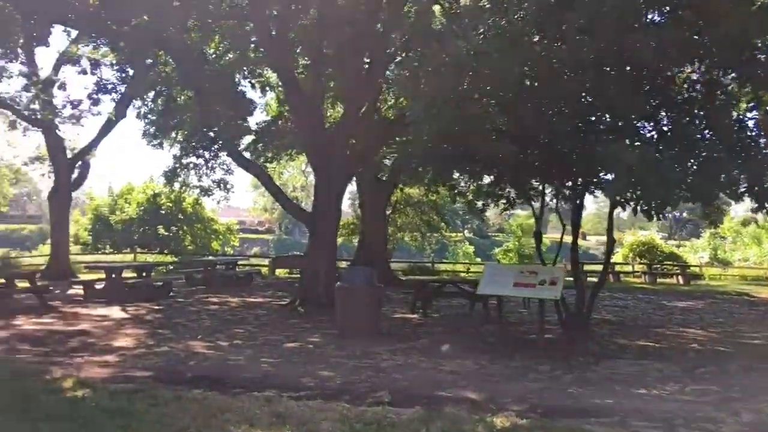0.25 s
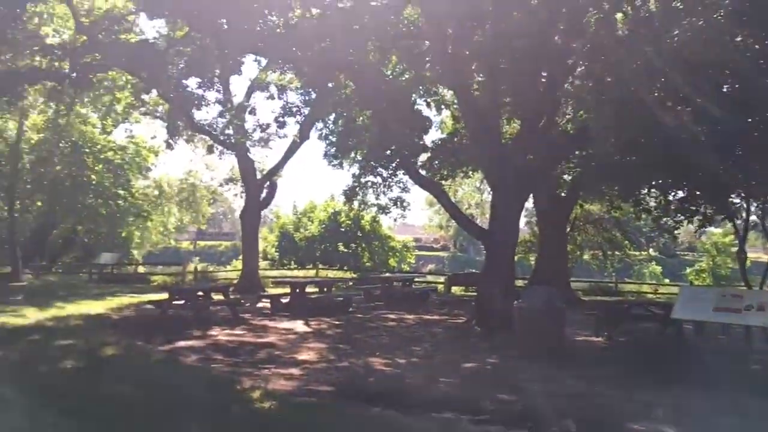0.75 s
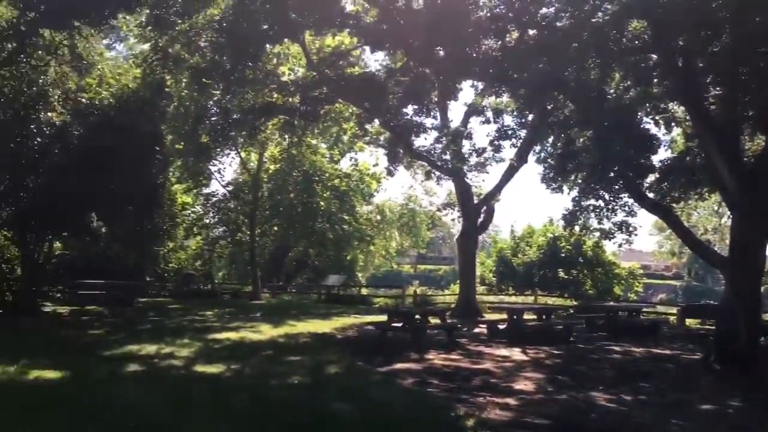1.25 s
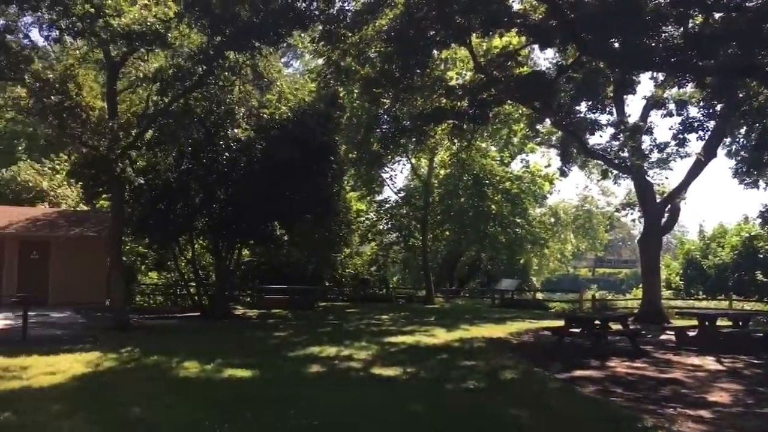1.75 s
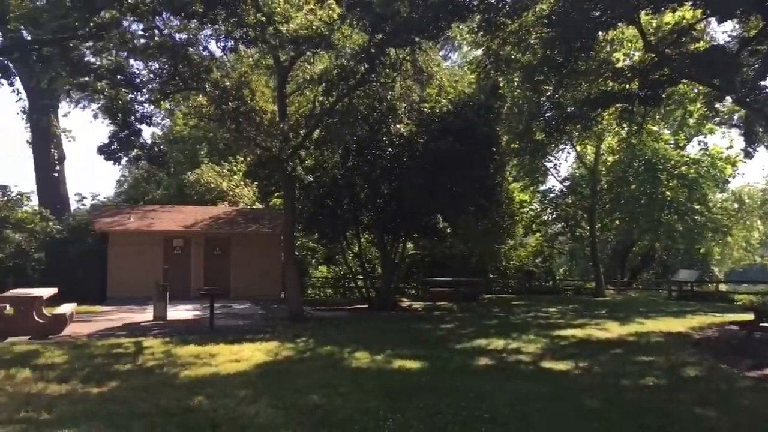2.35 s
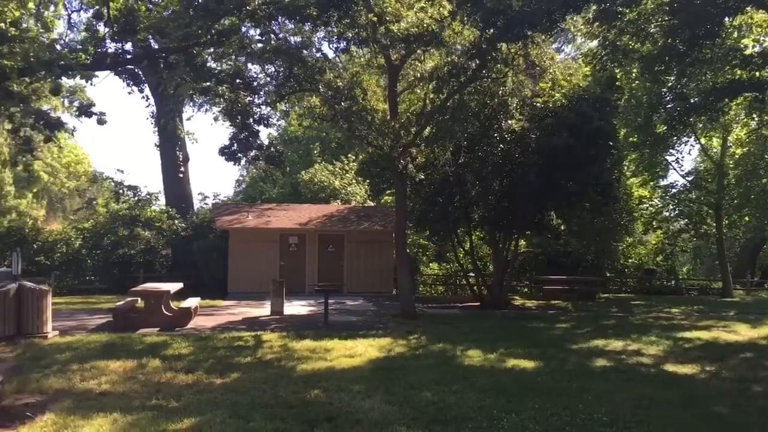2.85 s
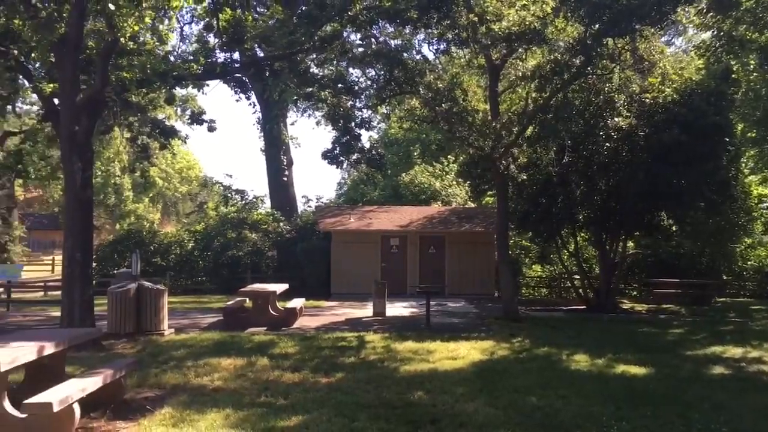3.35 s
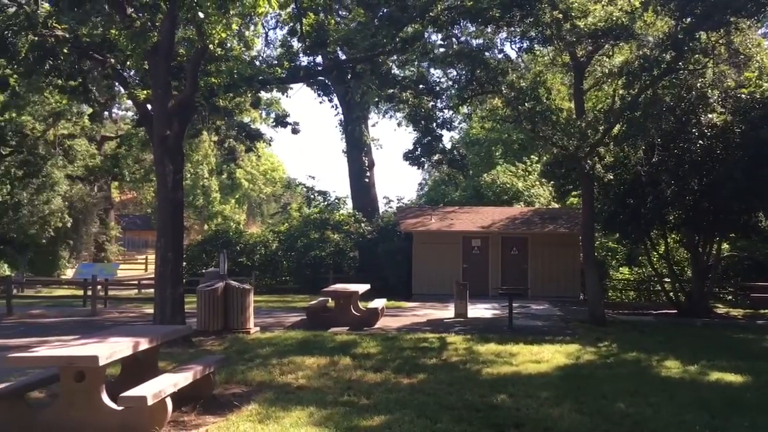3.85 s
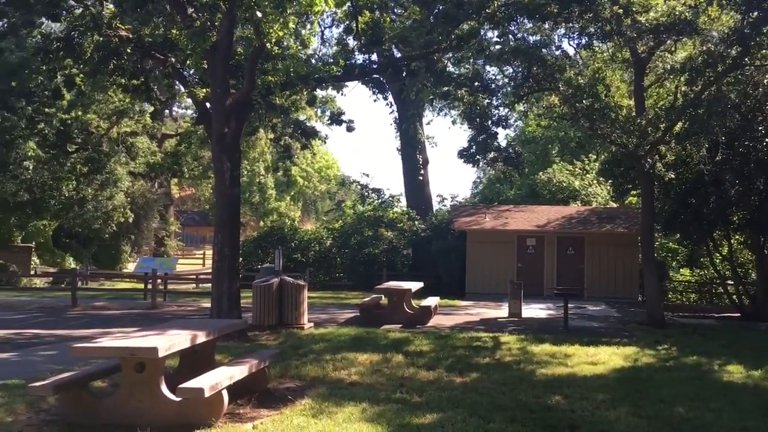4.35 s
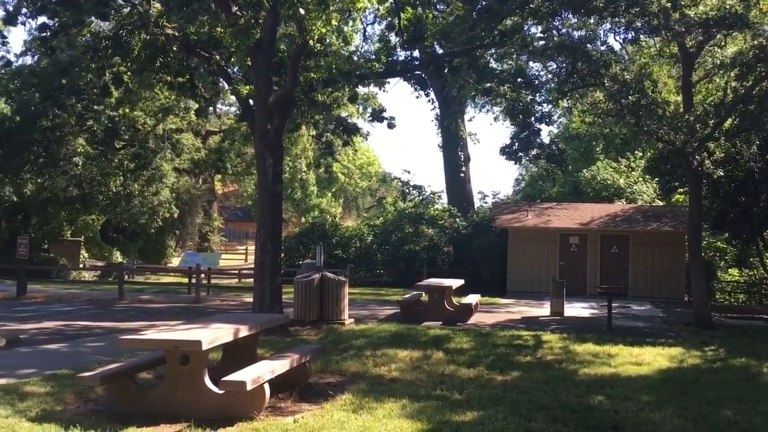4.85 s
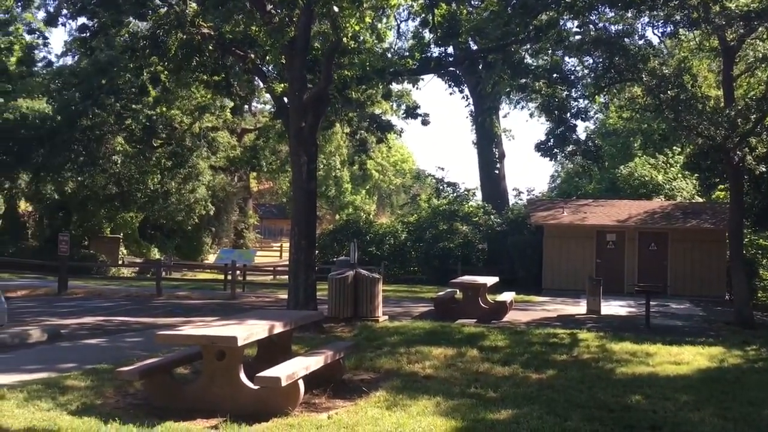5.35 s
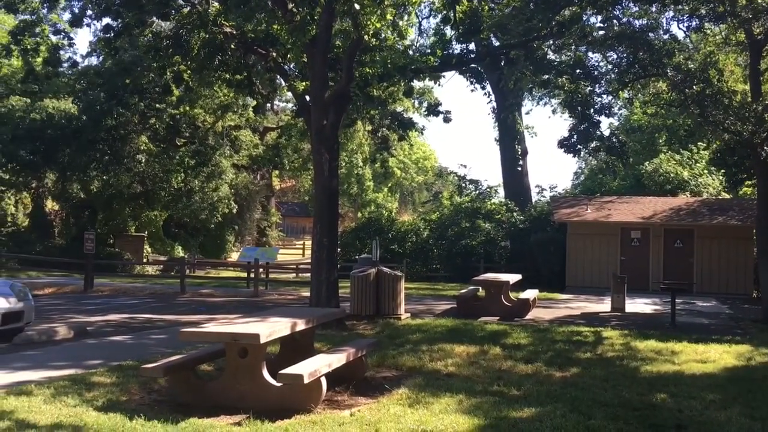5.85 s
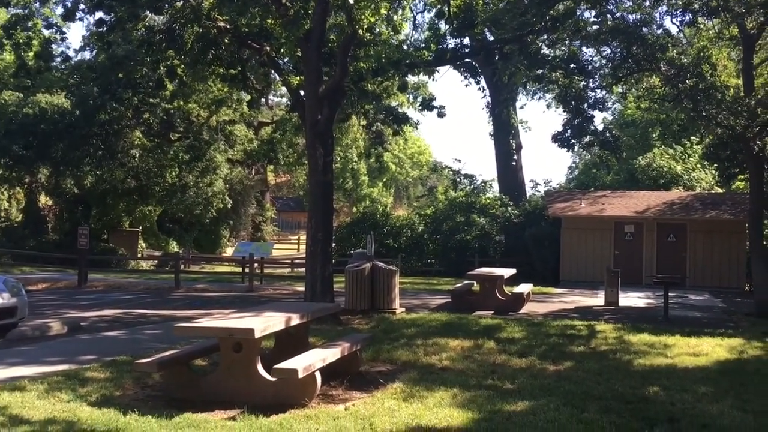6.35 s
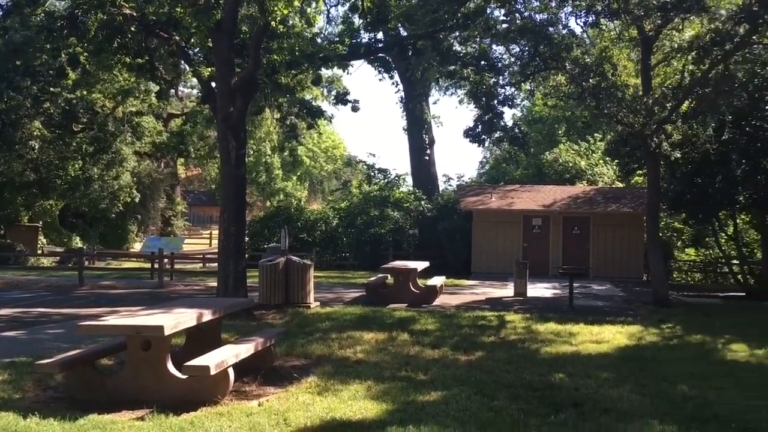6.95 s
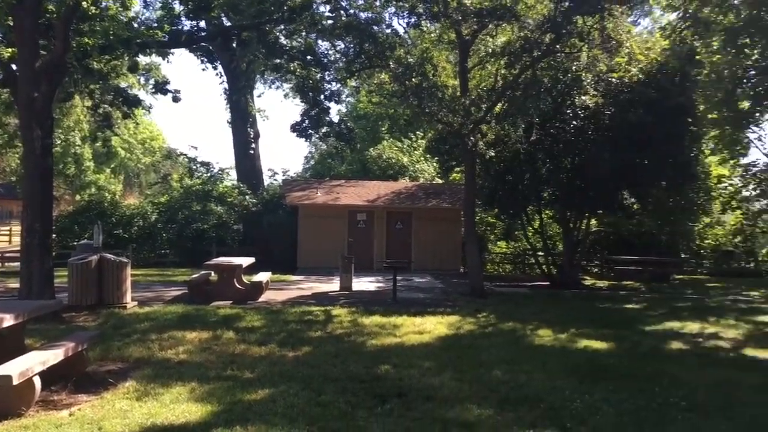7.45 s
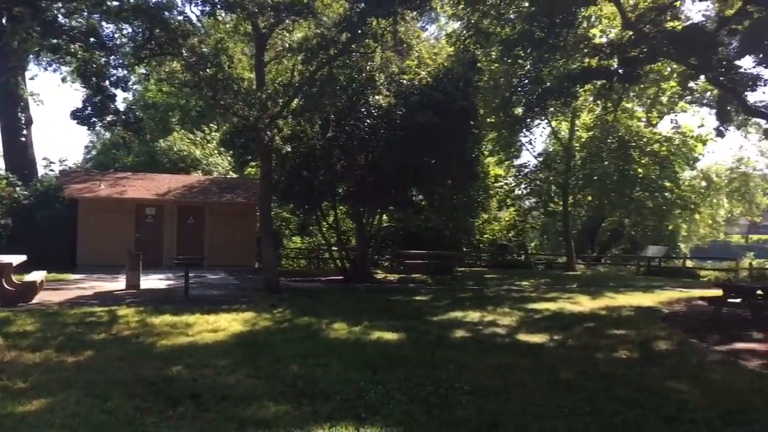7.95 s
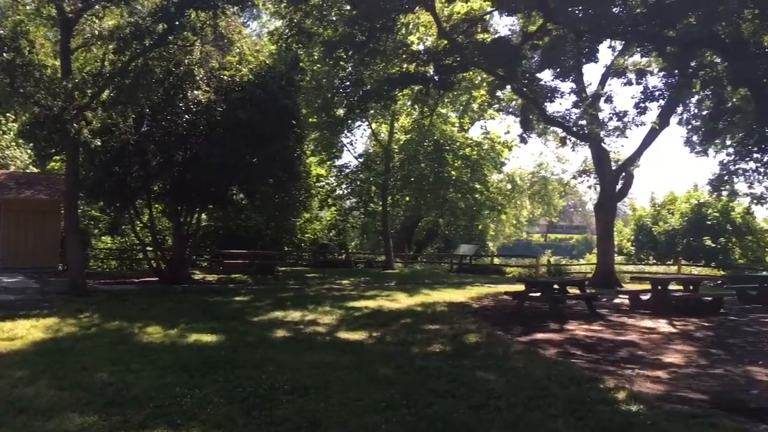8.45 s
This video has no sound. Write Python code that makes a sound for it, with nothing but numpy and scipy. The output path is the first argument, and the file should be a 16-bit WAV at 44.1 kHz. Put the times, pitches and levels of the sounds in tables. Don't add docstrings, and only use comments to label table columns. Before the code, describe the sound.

Birds chirp and sing buzzy slurred songs in a shaded park while a low engine drone and distant road rumble slowly grow underneath.

```python
import sys
import numpy as np
from scipy import signal
from scipy.fft import rfft, irfft, next_fast_len
from scipy.io import wavfile
from scipy.ndimage import uniform_filter1d

SR = 44100
rng = np.random.default_rng(int(sys.argv[2]) if len(sys.argv) > 2 else 0)


def inscribe(sig):
    pcm = np.round(np.clip(np.atleast_2d(sig).T, -1, 1) * 32767)
    wavfile.write(sys.argv[1], SR, pcm.astype(np.int16))


def decibels_to_gain(level_db):
    exponent = np.asarray(level_db, float) / 20
    return 10 ** exponent


N = 384111

# (time [s], firing rate [Hz], level [dB])
ENGINE = [(0, 85.7, -49.5), (.3, 86.8, -67), (.6, 87.25, -55), (.74, 87.58, -47.5), (1.1, 92.7, -44),
          (1.4, 95.3, -43), (1.8, 96.5, -42.5), (2.23, 96.83, -41), (2.84, 99.2, -42.5), (3.5, 101.1, -40),
          (4.05, 99.6, -47), (4.54, 93.8, -35), (4.85, 88.4, -41), (5.9, 86.96, -39.5), (6.62, 87.35, -35),
          (7.2, 87.6, -39), (8.55, 87.6, -36), (8.71, 86.5, -37.5)]
# (multiple of the firing rate, level [dB])
ORDERS = [(.5, -18), (.75, -11), (1, -0.5), (1.25, -18.5), (1.375, -17), (1.5, -23.5), (1.75, -25),
          (2.25, -26), (2, -22.5), (2.375, -25), (2.66, -28), (3, -33), (4.25, -36.5)]
# (time [s], half length [s], change [dB])
FADES = [(1.11, 0.033, -9), (1.67, 0.049, -6.5), (1.99, 0.083, -2), (2.84, 0.027, -13), (3.56, 0.047, -6.5),
         (3.91, 0.029, -9), (4.1, .03, -12), (5.1, 0.024, -8), (5.43, 0.042, -10), (5.6, 0.037, -6),
         (6.38, 0.036, -3), (7.75, 0.14, -0.5), (8.7, .05, -9), (4.68, 0.073, -2)]
# (time [s], gain [dB])
NEARNESS = [(0, 0.5), (1, -1), (2.4, -.5), (3.2, 0), (4, 1.5), (4.8, 2.5), (5.4, 4.5), (5.8, 6), (7, 6.5),
            (7.7, 6.5), (8.2, 7), (8.71, 9.5)]
# (time [s], half length [s], change [dB])
PASSES = [(.7, .3, 1.5), (4.1, .15, 1), (5.4, 0.065, 3), (7.25, 0.11, 4), (7.95, 0.13, -1),
          (8.4, 0.22, 4.5)]
# (time [s], half length [s], change [dB])
GUSTS = [(.83, 0.14, 6.5), (1.45, 0.098, 9.5), (1.19, 0.15, 1), (0.24, 0.071, -8), (2.3, 0.37, 2),
         (2.842, .15, 3.5), (4.83, .12, 3), (5.75, .2, 2), (6.3, .1, -4), (7.05, .15, 4.5), (8.1, .2, 5),
         (.58, 0.11, -7)]
# (frequency [Hz], density [dB per Hz])
THUD = [(15, -59), (25, -42), (35, 8.5), (45, 6.5), (65, 13), (80, 13.5), (110, -46.5)]
RUMBLE = [(50, -39.5), (80, 2.5), (120, -3.5), (200, -8), (270, -11.5), (310, -20), (370, -17),
          (480, -35.5), (700, -38), (1500, -82)]
ROAD = [(150, -50), (300, -8.5), (480, -6.5), (700, -0.5), (1000, -3), (1500, -6.5), (2000, -10),
        (2600, -15.5), (3600, -16.5), (5000, -30), (8000, -49.5), (12000, -80)]
AIR = [(800, -16), (2000, -6), (3500, -6.5), (5000, -4.5), (6500, -6), (7200, -9.5), (8000, -11.5),
       (9500, -8.5), (12000, -15.5), (14000, -19), (16000, -22)]
# (time [s], level [dB], pitch [Hz], length [s], second voice above [dB])
CHIPS = [(0.062, -67, 8000, 0.062, -6), (0.602, -67, 7950, 0.045, -4), (1.116, -65, 7980, 0.045, -21),
         (1.69, -71, 8075, 0.043, -3), (1.934, -69, 8070, 0.044, -10), (4.297, -64, 8098, 0.04, -12),
         (4.8657, -65.5, 7986, 0.045, -10), (5.912, -70, 7954, 0.045, -2), (6.6198, -70.5, 8036, 0.048, -3),
         (7.33, -69, 7805, 0.042, -3), (7.865, -69, 8000, 0.042, -7)]
LOW_CHIPS = [
    (2.4236, -72, 7800, 0.053, 3),
    (2.817, -64.5, 7764, 0.043, -9),
    (3.3681, -64.5, 7650, 0.033, -12),
    (3.848, -68, 7624, 0.051, -9),
]
# (time [s], length [s], level [dB], lowest [Hz], highest [Hz])
RUSTLES = [
    (0.348, 0.36, -79, 7000, 16000),
    (0.781, 0.16, -78.5, 7920, 16000),
    (1.477, 0.043, -63, 500, 3200),
    (1.458, .07, -81, 3500, 15000),
    (1.4975, 0.0015, -63, 500, 3500),
    (3.1, 0.0022, -69, 400, 4000),
    (3.16, .001, -69, 2000, 12000),
    (6.94, .19, -84, 7995, 16040),
]
# (time [s], length [s], pitch [Hz], width [Hz], level [dB])
BUZZES = [(0.658, 0.51, 1283, 90, -70), (3.139, 0.19, 1295, 110, -67), (1.501, 0.21, 1040, 150, -67),
          (1.301, 1.18, 368, 25, -74), (1.916, .034, 3025, 400, -66), (1.847, .03, 2985, 200, -79),
          (3.03, 0.074, 3850, 700, -72), (3.026, .09, 5300, 1500, -76), (3.18, 0.097, 3600, 900, -71.5),
          (3.181, 0.088, 5660, 1600, -74), (3.254, .09, 5350, 300, -87), (4.437, 0.063, 6500, 250, -85),
          (6.433, 0.149, 4270, 2500, -70.5), (8.27, .1, 4330, 400, -71)]
RISING = [
    (3.26, .29, 4100, 250, -83),
    (3.743, .358, 4835, 300, -79.5),
]
# (time [s], length [s], pitch [Hz], width [Hz], level [dB], rise [Hz/s])
RASP = (8.122, .155, 3500, 480, -63.5, 5500)
# (time [s], buzz length [s], slide time [s], buzz level [dB], slide level [dB])
SONGS = [
    (1.113, .365, 1.533, -51, -52),
    (5.672, .338, 6.078, -53, -57),
]
# (share of its length, level [dB], pitch [Hz], warble depth [Hz])
BUZZ_SHAPE = [
    (0, -22, 3470, 60),
    (.04, -4, 3800, 200),
    (.09, 2, 4120, 370),
    (.3, 1.5, 4250, 360),
    (.52, -2, 4220, 420),
    (.74, -2.5, 3960, 400),
    (.87, -3, 3720, 200),
    (1, -2.5, 3790, 150),
    (1.06, -14, 3830, 100),
]
# (time after start [s], level [dB], pitch [Hz])
SWOOP = [
    (0, -8, 3100),
    (.007, -8, 2900),
    (.015, -5, 4150),
    (.028, -5, 3800),
    (.042, -1, 3280),
    (.072, 0, 2870),
    (.092, -8, 2600),
    (.112, -19, 2440),
]
# (time [s], stretch, level [dB])
SWOOPS = [
    (1.918, 1.0, -53.5),
    (8.369, .86, -59.5),
]
# (time [s], length [s], level [dB], start [Hz], end [Hz])
SLURS = [
    (7.76, .064, -68, 7330, 5760),
    (7.44, .17, -70, 4620, 4340),
    (4.93, .17, -68, 4600, 4170),
    (5.92, .055, -61, 3550, 2830),
]
PLUNGES = [
    (6.246, .038, -64, 6990, 5390),
    (6.335, .066, -67, 5750, 3900),
    (3.008, .021, -70, 5150, 3750),
    (2.93, .015, -72, 5800, 4000),
    (7.817, .017, -70, 5830, 5380),
    (8.562, .028, -60, 3230, 2770),
]
WHISTLES = [(2.665, .21, -72, 3720, 3680), (2.878, .058, -65, 6900, 5690), (3.13, .025, -76, 3356, 3300),
            (3.37, .05, -81, 5690, 5250), (4.22, .13, -69, 3230, 3250), (4.8, .13, -80, 4960, 4620),
            (4.85, .1, -78.5, 3856, 3800), (5.1, .19, -77, 4190, 4200), (6.51, .04, -71, 4100, 4070),
            (6.52, .04, -72, 3350, 3396), (7.65, .3, -74.5, 4530, 4330), (8.1, .12, -73.5, 4960, 4920),
            (8.235, .06, -69, 5460, 5380), (8.295, .05, -59.5, 5320, 5300), (8.345, .18, -73, 5290, 5270),
            (8.525, .04, -66, 2950, 3220), (8.61, .09, -66, 2516, 2490), (8.379, .022, -59, 4330, 3500)]
# (time [s], length [s], level [dB], edge [Hz], top [Hz])
ARCHES = [(3.57, .165, -74, 4520, 4950)]
# (time [s], level [dB])
TRILL = [(4.405, -74), (4.575, -75), (4.736, -74), (4.892, -73), (5.052, -73), (5.216, -70)]
# (centre [Hz], width [Hz], depth [dB])
MIC_NOTCH = (10400, 1050, -4.5)

ROAD_DB, RUMBLE_DB, INSECT_DB, THUD_DB, AIR_DB = -61, -53, -86.5, -50.5, -75
RUMBLE_FOLLOWS, INSECT_FOLLOWS = 0.78, 2.39
TREES_T60, TREES_DB = 0.87, -0.5
RISE_HZ_PER_S = 2300
WARBLE_HZ, WARBLE_JITTER = 297, .125
SONG_OVERTONES_DB = (-39.5, -38)
FLUTTER_DB = 2.1
FLIP_HZ, FLIP_TOP_HZ, FLIP_DB = 4000, 4620, -11
SLIDE_HZ, SLIDE_S = (3900, 3480), .08
TRILL_HZ, TRILL_S = (6050, 4600), .042
SLUR_BEND, PLUNGE_BEND, TRILL_BEND = .6, 2.8, .7
SLUR_ENDS_DB, ENDS_DB = (-4, -5), (-1.5, -3)


def evened(x):
    return x / np.sqrt(np.mean(x ** 2) + 1e-20)


def add(mix, s, sound):
    part = mix[round(s * SR):][:len(sound)]
    part += sound[:len(part)]


def unroll(rows):
    s, *columns = np.transpose(rows)
    t = np.arange(s[0], s[-1], 1 / SR)
    return s[0], [np.interp(t, s, c) for c in columns]


def throughout(rows):
    return [np.pad(c, (0, N), "edge")[:N] for c in unroll(rows)[1]]


def drift(size, hz):
    long = next_fast_len(size + 4096)
    spectrum = rfft(rng.standard_normal(long))
    lowpass = 1 + (np.fft.rfftfreq(long, 1 / SR) / hz) ** 2
    return evened(irfft(spectrum / lowpass, long)[:size])


def bumps(rows):
    t = np.arange(N) / SR
    return sum(db * np.exp(-((t - s) / half) ** 2) for s, half, db in rows)


def resonate(x, hz, width_hz):
    turn = np.exp(2j * np.pi * np.cumsum(hz * np.ones(len(x))) / SR)
    r = np.exp(-np.pi * width_hz / SR)
    return (turn * signal.lfilter([1], [1, -2 * r, r * r], x / turn)).real


def wash(spectrum, patchy_db):
    hz = np.fft.rfftfreq(2048, 1 / SR)
    f, db = np.transpose(spectrum)
    a, b, patches = rng.standard_normal((N // 512 + 5, 1025, 3)).T
    patches = uniform_filter1d(patches, size=16, axis=0)
    patches = evened(uniform_filter1d(patches, size=12, axis=1))
    colour_db = np.interp(np.log(hz + 1), np.log(f), db)[:, None]
    bins = (a + 1j * b) * decibels_to_gain(colour_db + patchy_db * patches)
    return evened(signal.istft(bins, nperseg=2048, noverlap=1536)[1][:N])


def engine():
    hz, db = throughout(ENGINE)
    phase = 2 * np.pi * np.cumsum(hz + 0.784 * drift(N, 5.88)) / SR
    slow_db = uniform_filter1d(db, size=SR)
    drone = np.zeros(N)
    for k, order_db in ORDERS:
        if k == 1:
            level = db + 1.75 * drift(N, 18) + 0.84 * drift(N, 5.7) + bumps(FADES)
        else:
            level = slow_db + 2.716 * drift(N, 3.2)
        drone += decibels_to_gain(level + order_db) * np.cos(k * phase + 7 * rng.random())
    return np.sqrt(2) * drone


def thuds():
    return decibels_to_gain(THUD_DB + bumps(GUSTS) + 3.2 * drift(N, 1.9)) * wash(THUD, patchy_db=2.5)


def rumble(near_db):
    level = RUMBLE_DB + RUMBLE_FOLLOWS * near_db + bumps(PASSES) + 0.63 * drift(N, 2.0)
    return decibels_to_gain(level) * wash(RUMBLE, patchy_db=1.55)


def road(near_db):
    return decibels_to_gain(ROAD_DB + near_db + 0.23 * drift(N, 3.9)) * wash(ROAD, patchy_db=0.92)


def insects(near_db):
    hum = evened(resonate(rng.standard_normal(N), 3400 + 40 * drift(N, 6.9), 270))
    pulsing = decibels_to_gain(0.83 * drift(N, 25) + 1.8 * drift(N, 4.3))
    return decibels_to_gain(INSECT_DB + INSECT_FOLLOWS * near_db) * hum * pulsing


def air():
    return decibels_to_gain(AIR_DB) * wash(AIR, patchy_db=0.5)


def background():
    near_db = throughout(NEARNESS)[0]
    return thuds() + rumble(near_db) + road(near_db) + insects(near_db) + air()


def chip(s, db, hz, length, upper_db):
    t = np.arange(0, length, 1 / SR)
    pitch = hz + 450 * np.exp(-t / .005) + 55 * drift(len(t), 200)
    lower = np.sin(2 * np.pi * np.cumsum(pitch) / SR)
    upper = np.sin(2 * np.pi * np.cumsum(pitch + 380) / SR)
    envelope = decibels_to_gain(db - 3.0 - 160 * t) * signal.windows.tukey(len(t), .45)
    return s - .004, envelope * (lower + decibels_to_gain(upper_db) * upper)


def trees(x):
    taps, t = np.zeros(SR), np.arange(SR) / SR
    at = np.arange(60, SR - 20, 20)
    taps[at + rng.integers(0, 20, len(at))] = rng.choice([-1., 1.], len(at))
    taps *= decibels_to_gain(-60 * t / TREES_T60) + decibels_to_gain(3.0 - 60 * t / 0.12)
    return x + decibels_to_gain(TREES_DB) * signal.fftconvolve(x, taps / np.linalg.norm(taps))[:N]


def rustle(s, length, db, low_hz, high_hz):
    count = round(length * SR)
    grains = rng.standard_normal(count) * decibels_to_gain(1.3 * drift(count, 80)) * signal.windows.tukey(count, .3)
    band = signal.butter(2, [low_hz, high_hz], "band", fs=SR, output="sos")
    return s, decibels_to_gain(db) * evened(signal.sosfilt(band, grains))


def buzz(s, length, hz, width_hz, db, rise=0):
    t = np.arange(0, length, 1 / SR)
    rattle = rng.standard_normal(len(t)) * (1 + 0.34 * np.sin(2 * np.pi * 90 * t))
    call = evened(resonate(rattle, hz + rise * t, width_hz))
    return s, decibels_to_gain(db) * call * signal.windows.tukey(len(t), .4)


def song(rows):
    s, (db, hz, depth_hz) = unroll(rows)
    count = len(hz)
    beat_hz = WARBLE_HZ * hz / hz.max() * (1 + WARBLE_JITTER * drift(count, 98))
    beat = 2 * np.pi * np.cumsum(beat_hz) / SR
    carrier = 2 * np.pi * np.cumsum(hz + 0.127 * depth_hz * drift(count, 158)) / SR
    phase = carrier - 0.82 * depth_hz / WARBLE_HZ * np.cos(beat)
    throb = 1 + 0.26 * depth_hz / 350 * np.sin(beat + 0.36)
    whistle = evened(resonate(throb * np.sin(phase), hz + 60, 1150))
    overtones = sum(decibels_to_gain(d) * np.sin(k * phase) for k, d in zip((2, 3), SONG_OVERTONES_DB))
    squeeze = decibels_to_gain(14.5 * np.sin(beat))
    envelope = decibels_to_gain(db + FLUTTER_DB * drift(count, 220)) * signal.windows.tukey(count, .02)
    return s, envelope * (whistle + squeeze * overtones)


def note(rows):
    s, (db, hz) = unroll(rows)
    hz = uniform_filter1d(hz, size=250) + 32 * drift(len(hz), 180)
    edge = signal.windows.tukey(len(hz), min(1, 0.008 * SR / len(hz)))
    level = decibels_to_gain(db + 0.87 * FLUTTER_DB * drift(len(hz), 110))
    return s, level * np.sqrt(2) * np.sin(2 * np.pi * np.cumsum(hz) / SR) * edge


def shaped(s, length, db, start_hz, end_hz, bend=0.92, ends_db=ENDS_DB):
    u = np.linspace(0, 1, num=24)
    if bend < 1:
        way = 1 - (1 - u) ** (1 / bend)
    else:
        way = u ** bend
    level = db + ends_db[0] * (1 - u) ** 3 + ends_db[1] * u ** 3
    return np.transpose([s + length * u, level, start_hz + (end_hz - start_hz) * way])


def arched(s, length, db, edge_hz, top_hz):
    rows = shaped(s, length, db, edge_hz, edge_hz)
    arch = np.sin(np.linspace(0, np.pi, len(rows))) ** 0.76
    return rows + np.outer(arch, [0, 0, top_hz - edge_hz])


def whole_song(s, length, slide_s, db, slide_db):
    yield song(np.array(BUZZ_SHAPE) * [length, 1, 1, 1] + [s, db, 0, 0])
    yield note(arched(s + length, slide_s - s - length, db + FLIP_DB, FLIP_HZ, FLIP_TOP_HZ))
    yield note(shaped(slide_s, SLIDE_S, slide_db, *SLIDE_HZ, .75, (-3, -9)))


def notes():
    return [*(np.multiply(SWOOP, [k, 1, 1]) + [s, db, 0] for s, k, db in SWOOPS),
            *(shaped(*r, SLUR_BEND, SLUR_ENDS_DB) for r in SLURS),
            *(shaped(*r, PLUNGE_BEND, (-7, -1)) for r in PLUNGES),
            *(shaped(*r) for r in WHISTLES),
            *(arched(*r) for r in ARCHES),
            *(shaped(s, TRILL_S, db, *TRILL_HZ, TRILL_BEND, (-3, -9)) for s, db in TRILL)]


def scene():
    birds, near = np.zeros(N), np.zeros(N)
    far = engine() + background()
    calls = [*(chip(*r) for r in CHIPS + LOW_CHIPS),
             *(buzz(*r) for r in BUZZES + [RASP]),
             *(buzz(*r, RISE_HZ_PER_S) for r in RISING),
             *(c for r in SONGS for c in whole_song(*r)),
             *map(note, notes())]
    for call in calls:
        add(birds, *call)
    for row in RUSTLES:
        add(near, *rustle(*row))
    return (trees(birds) + near + far)[None]


def band_limit(x):
    return signal.sosfilt(signal.butter(12, 15680, fs=SR, output="sos"), x)


def record(dry):
    hz, width_hz, db = MIC_NOTCH
    cavity = signal.filtfilt(*signal.iirpeak(hz, hz / width_hz, SR), dry)
    mix = dry - (1 - decibels_to_gain(db)) * cavity
    return band_limit(mix)


dry = scene()
out = record(dry)
inscribe(out)
```